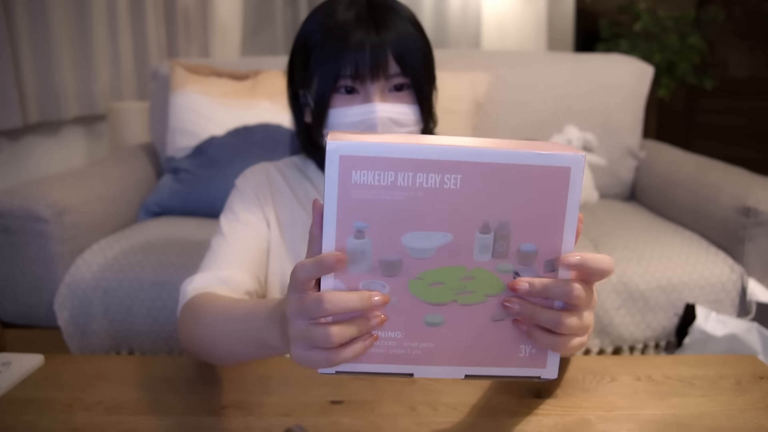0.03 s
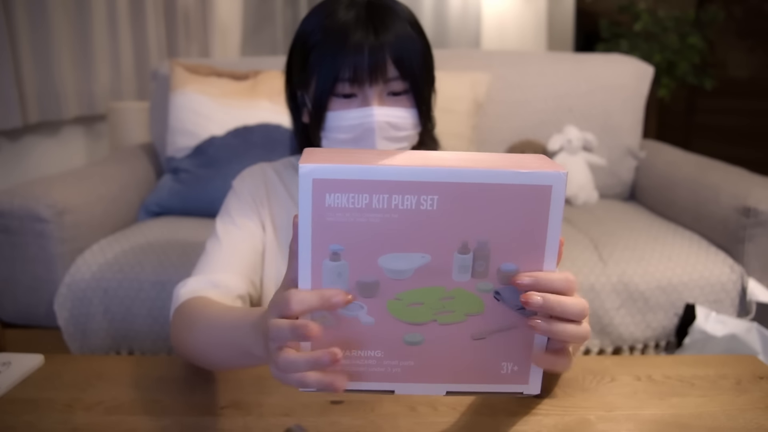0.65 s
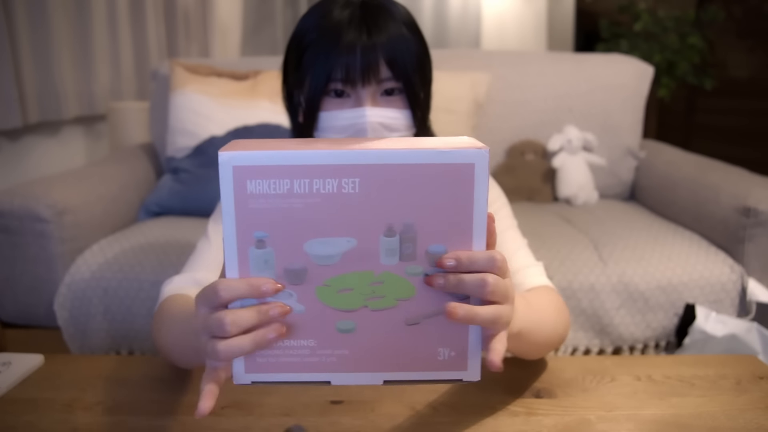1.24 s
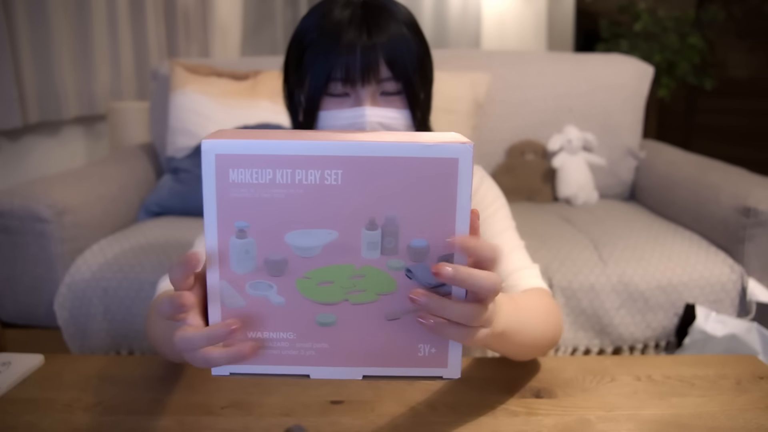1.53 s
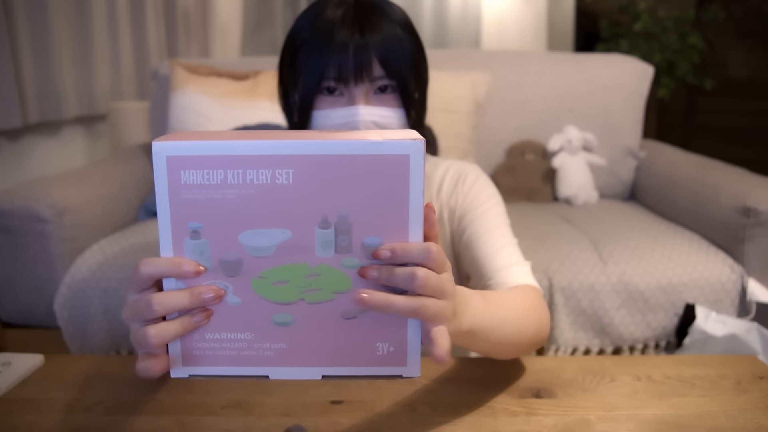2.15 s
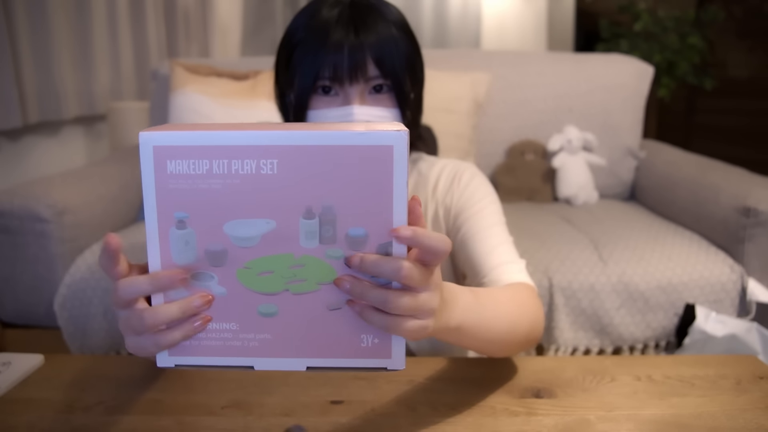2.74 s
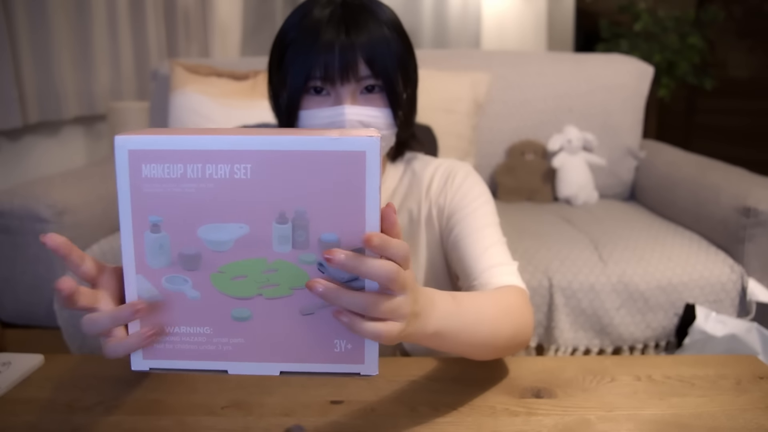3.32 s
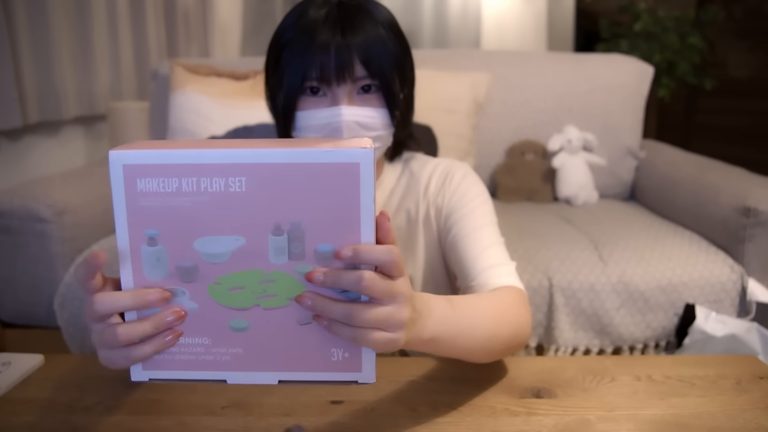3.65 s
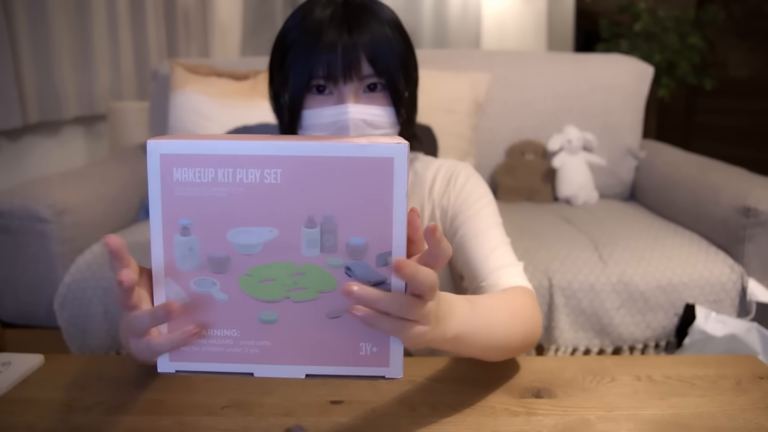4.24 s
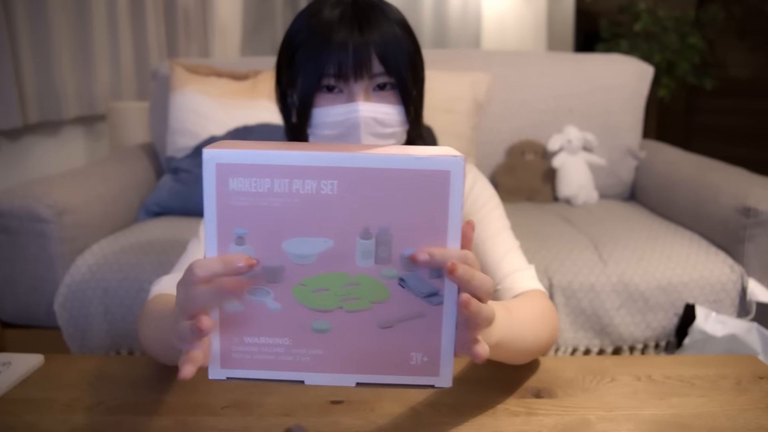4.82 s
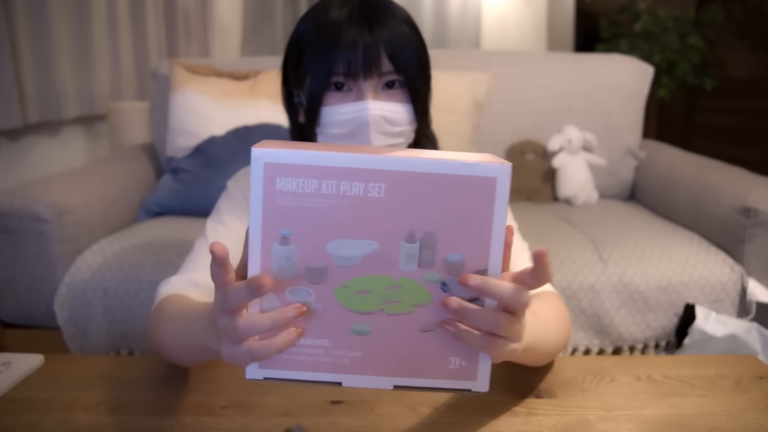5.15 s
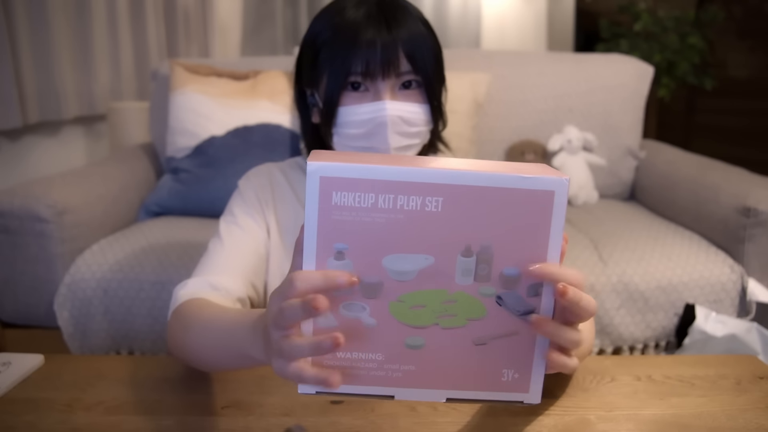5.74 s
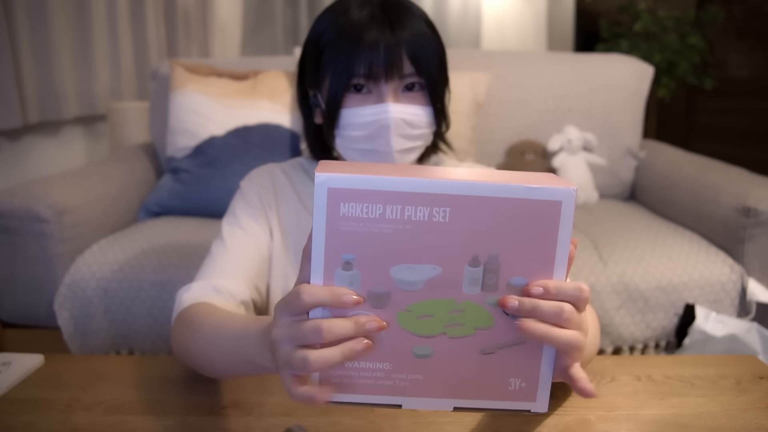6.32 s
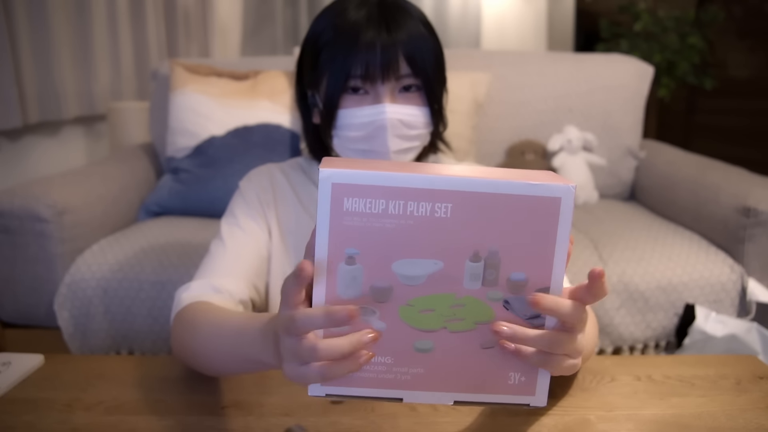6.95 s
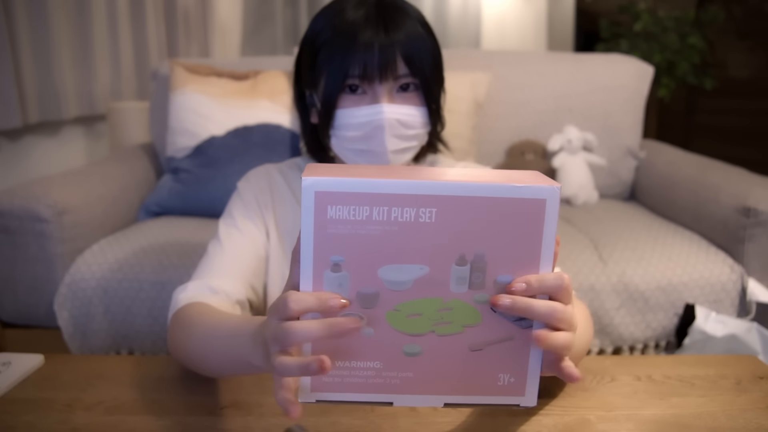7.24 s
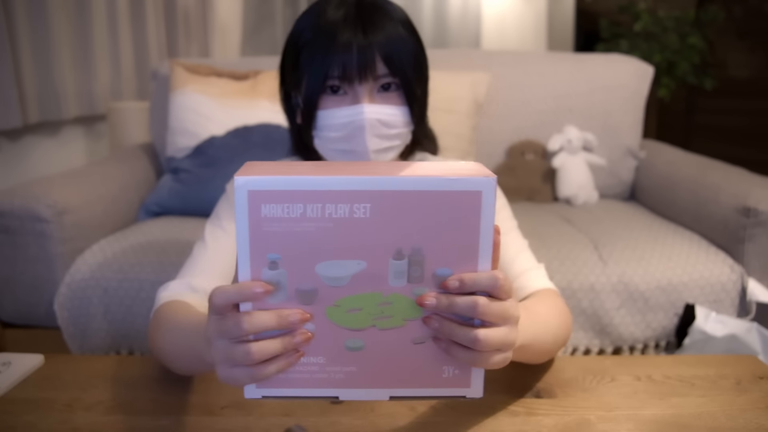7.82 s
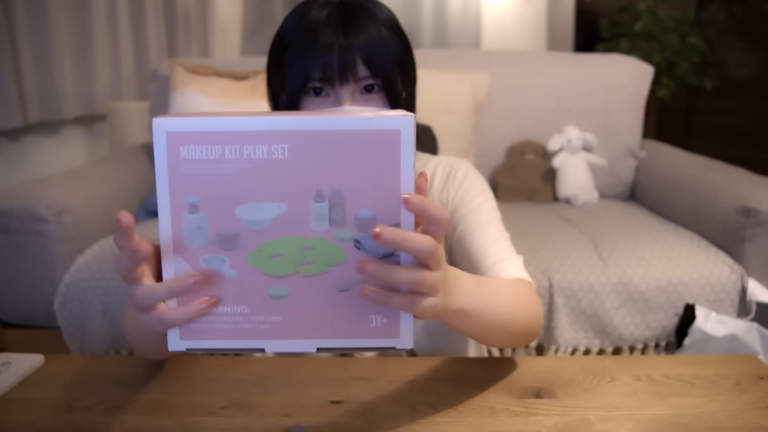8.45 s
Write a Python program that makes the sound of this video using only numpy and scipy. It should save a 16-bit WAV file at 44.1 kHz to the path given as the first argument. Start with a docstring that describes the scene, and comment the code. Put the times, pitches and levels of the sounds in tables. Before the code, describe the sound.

Long fingernails drum on a thin cardboard box close to a stereo microphone for almost nine seconds. From the start the rolls come about twice a second: one finger lands softly, then about three nails tap in quick succession, each giving a small hollow thump with a crisp click on top. Between taps the fingers press, catch and rub lightly on the card, and the box rings faintly. A hard knock stands out at about 3.2 seconds and another at about 8.3 seconds, each briefly ringing in the small, quiet room. The tapping begins near the centre, leans left from about 1.5 to 4.5 seconds, returns to the centre around 6 to 7 seconds and moves left again at the end. A deep, wavering rumble and faint room air continue underneath throughout.

```python
"""Long fingernails drum on a thin cardboard box close to a stereo microphone, about two rolls a second.
Per roll one finger lands softly, then about three nails tap: the panel thumps, fibres crack, the nail ticks.
Between taps the hand presses, catches and rubs on the card. The hollow box rings faintly.
Two hard knocks set the small, quiet room ringing; a deep rumble lies under everything."""
import sys
import numpy as np
from scipy import signal
from scipy.fft import rfft, irfft
from scipy.io import wavfile

SR = 44100
rng = np.random.default_rng(int(sys.argv[2]) if len(sys.argv) > 2 else 0)


def file_out(sig):
    """Save sig as 16-bit WAV at sys.argv[1]."""
    # one column per channel
    cols = np.atleast_2d(sig).T
    # limit, then scale
    lim = np.clip(cols, -1, 1)
    pcm = np.round(lim * 32767).astype(np.int16)
    wavfile.write(sys.argv[1], SR, pcm)


N = 382788
TIME_S = np.arange(N) / SR
HIT_SAMPLES = 2048
HIT_S = np.arange(HIT_SAMPLES) / SR
HIT_HZ = np.fft.rfftfreq(HIT_SAMPLES, 1 / SR)
ROLL_S = .46  # typical roll period


def amp(db):
    """Decibels to gain."""
    return 10 ** (np.asarray(db) / 20)


def curve_at(points, hz):
    """Interpolate on a log-frequency axis."""
    freq_hz, value = np.transpose(points)
    return np.interp(np.log(hz + 1), np.log(freq_hz), value)


def unit_rms(x):
    """Scale to rms 1."""
    return x / np.sqrt(np.mean(x ** 2) + 1e-20)


def at_level(x, db):
    """Scale a hit to the energy of db rms held for 10 ms."""
    return x * amp(db) * np.sqrt(.01 * SR / (np.mean(np.sum(x ** 2, -1)) + 1e-20))


def add(mix, start_s, sound):
    """Mix in a stereo sound."""
    part = mix[:, max(round(start_s * SR), 0):][:, :sound.shape[1]]
    part += sound[:, :part.shape[1]]


def minimum_phase(gain_db):
    """Response that rings only after the blow."""
    log_gain = np.log(amp(np.r_[gain_db, gain_db[-2:0:-1]]))
    return np.exp(np.conj(signal.hilbert(log_gain)))[:len(gain_db)]


def coloured(noise, spectrum):
    """Shape a full-length noise, rms 1."""
    gain = amp(curve_at(spectrum, np.fft.rfftfreq(N, 1 / SR)))
    return unit_rms(irfft(rfft(noise) * gain, N))


def panned(x, pan_db, lead_s_per_db=1.7e-5):
    """The nearer microphone hears a hit louder and earlier."""
    sides_db = np.array([[pan_db], [-pan_db]])
    delay_samples = np.round(np.maximum(-sides_db * lead_s_per_db, 0) * SR)
    delayed = irfft(rfft(x) * np.exp(-2j * np.pi * HIT_HZ * delay_samples / SR))
    return unit_rms(amp(sides_db / 2)) * delayed


# Still air: freq_hz, density_db
AIR_SPECTRUM = [(8, 0), (36, 0), (52, -15), (80, -24), (170, -23), (450, -34), (1000, -41), (3000, -53),
                (15000, -64.5)]


def rumble(hum_hz=32.2, width_hz=1.1, hum_db=-44.3, air_db=-49, waver=.7):
    """Deep, wavering hum in still room air."""
    hz = np.fft.rfftfreq(N, 1 / SR)
    noise = rng.standard_normal((6, N))
    band = 1 / (1 + ((hz - hum_hz) / width_hz) ** 4)
    hum = unit_rms(irfft(rfft(noise[0] + .55 * noise[1:3]) * band, N))
    hum = unit_rms(hum / (abs(signal.hilbert(hum)) + waver))  # flattens the swells
    air = coloured(.6 * noise[3] + noise[4:], AIR_SPECTRUM)
    return amp(hum_db) * hum * amp([[-2.5], [1]]) + amp(air_db) * air


# Room decay: freq_hz, t60_s
ROOM_DECAY = [(150, .28), (800, .25), (2000, .26), (5000, .26), (15000, .22)]
# Room tail: freq_hz, level_db
ROOM_SPECTRUM = [(100, -15), (300, -19), (800, -16.5), (1400, -15), (2000, -15), (3200, -13), (8000, -14),
                 (15000, -15)]


def room(x, early_s=.016, early_gain=1.1):
    """Dense random echoes: table and body first, then the walls, each band at its own decay rate."""
    echoes = rng.standard_normal((2, SR // 2)) * (rng.random((2, SR // 2)) < .06)
    echoes = unit_rms(echoes + .3 * echoes[::-1])
    hz, t, bands = signal.stft(echoes, SR, nperseg=256)
    t60_s = curve_at(ROOM_DECAY, hz)[:, None]
    level_db = curve_at(ROOM_SPECTRUM, hz)[:, None] - 60 * t / t60_s
    bands *= amp(level_db) * np.sqrt(2 * np.log(1000) / (t60_s * SR))
    tail = signal.istft(bands, SR, nperseg=256)[1]
    tail_s = np.arange(tail.shape[1]) / SR
    tail *= np.interp(tail_s, [.001, .009, early_s, early_s + .005], [0, early_gain, early_gain, 1])
    return signal.oaconvolve(.7 * x + .3 * x[::-1], tail, axes=1)[:, :N]


def shifting_echoes(x, cycle_s=.37, patterns=3):
    """Fingers strike new spots and the box sways, so the echo pattern keeps changing."""
    active = (TIME_S / cycle_s * patterns).astype(int) % patterns
    return sum(room(x * (active == k)) for k in range(patterns))


# Hollow box resonances: pitch_hz, relative_db, t60_s
BOX_MODES = [(165, -19, .25), (270, -15.5, .2), (862, -22, .15), (1053, -26, .12)]


def box_ring(x):
    """Air and walls of the box ring faintly after each blow."""
    t = np.arange(SR // 2) / SR
    ring = np.zeros_like(t)
    for pitch_hz, relative_db, t60_s in BOX_MODES:
        gain = amp(relative_db + 12) * np.log(1000) / (t60_s * SR)
        ring += gain * np.cos(2 * np.pi * pitch_hz * t) * amp(-60 * t / t60_s)
    return signal.oaconvolve(x, ring[None], axes=1)[:, :N]


# Box position: time_s, left_over_right_db
BOX_PATH = [(0, -4), (.8, 0), (1.6, 8), (3.9, 9), (6.4, -2), (7.3, 0), (8.3, 7)]


def box_pan_db(time_s):
    """The box is carried slowly from side to side."""
    return np.interp(time_s, *np.transpose(BOX_PATH))


# Panel thump: pitch_ratio, level_db
THUMP_SPECTRUM = [(.2, -20), (.45, -6.5), (.72, -1), (1.02, 0), (1.4, -5), (1.9, -14), (3, -30), (8, -60)]


def panel_gain(pitch_hz):
    """Spectrum of the panel pushed in and swinging back, dead within two cycles."""
    ratio, level_db = np.transpose(THUMP_SPECTRUM)
    return amp(np.interp(np.log(HIT_HZ + 1), np.log(pitch_hz * ratio), level_db))


def dent(gain, bend_hz=110):
    """An outside blow first drops the pressure; slow bending waves arrive late and swell the rebound."""
    allpass = (1j * HIT_HZ - bend_hz) / (1j * HIT_HZ + bend_hz)
    return -irfft(minimum_phase(20 * np.log10(gain + 1e-7)) * allpass)


def ripple_db(depth_db, points=20):
    """Each spot on the card has its own broad peaks and dips."""
    return depth_db * np.interp(HIT_HZ, np.geomspace(400, 16000, points), rng.standard_normal(points))


def crunch(spectrum, decay_s, snap, width, spot_db, slip_gain=.26, slip_within_s=.006):
    """Nail meets card: a snap, crushing fibres and a small second slip, different at each microphone."""
    since_slip_s = HIT_S - slip_within_s * rng.uniform(.15, 1)
    slip = slip_gain * rng.uniform(0, 1.5) * (since_slip_s > 0) * np.exp(-abs(since_slip_s) / decay_s)
    grit = rng.standard_normal((3, HIT_SAMPLES)) * (np.exp(-HIT_S / decay_s) + slip)
    grit = grit[0] + width * grit[1:]
    grit /= np.sqrt(np.sum(grit ** 2) / 2)
    grit[:, 0] -= snap
    return irfft(rfft(grit) * minimum_phase(curve_at(spectrum, HIT_HZ) + ripple_db(spot_db)))


def puff(time_s, level_db, width_s=.0058, rebound_s=.021, rebound_gain=.42):
    """A finger pad shoves the box and it sways back: one slow air pulse. Returns start_s, sound."""
    t = np.arange(3 * HIT_SAMPLES) / SR - .03
    wave = rebound_gain * np.exp(-((t - rebound_s) / .012) ** 2) - np.exp(-(t / width_s) ** 2)
    pan_db = 1.8 * box_pan_db(time_s)
    sides = unit_rms(amp(np.array([[pan_db], [-pan_db]]) / 2))
    return time_s - .021, amp(level_db) * wave * sides


# Firm pad presses: time_s, level_db
PAD_PRESSES = [(1.381, -30), (1.803, -21), (2.241, -25), (2.569, -29), (2.693, -24), (3.172, -28),
               (3.634, -23), (5.962, -30), (7.294, -30)]


def pressing():
    """The box gives under each landing, tap and firm press."""
    out = np.zeros((2, N))
    for start_s, nail_db in SOFT_LANDINGS:
        add(out, *puff(start_s, min(fingertip_db(start_s, nail_db) + 10.5, -26)))
    for start_s, blow_db, *_ in NAIL_TAPS:
        add(out, *puff(start_s - .004, min(blow_db - 4, -35.5)))
    for time_s, level_db in PAD_PRESSES:
        add(out, *puff(time_s, level_db))
    return out


def roll_starts_s():
    """Landing times, padded by one roll at each end."""
    starts_s = np.transpose(SOFT_LANDINGS)[0]
    return np.r_[starts_s[0] - ROLL_S, starts_s, starts_s[-1] + ROLL_S]


def skin_grip(lift_s=.08, lifted_db=-22):
    """Drag through each roll: most as the fingers peel off, least while they hover."""
    starts_s = roll_starts_s()
    roll = np.clip(np.searchsorted(starts_s, TIME_S), 1, len(starts_s) - 1)
    length_s = np.minimum(starts_s[roll] - starts_s[roll - 1], ROLL_S + .02)
    elapsed_s = TIME_S - starts_s[roll - 1]
    lifted = np.clip((elapsed_s - length_s + lift_s) / .02, 0, 1)
    drag_db = np.interp(elapsed_s / length_s, [0, .05, .1, .45, .6, .75, 1], [-4, -3, -13, -6, -6, 1.5, 0])
    return amp(drag_db + lifted_db * lifted)


def rubbing(rub_db=-63, slips_per_s=280, spread_db=5.2, hiss=.3, catches_per_s=10, catch_db=-59):
    """Skin and nails drag on card: sparse uneven slips, fine hiss, occasional faint catches."""
    grip = skin_grip()
    slips = (rng.random(N) < slips_per_s / SR) * amp(spread_db * np.minimum(rng.exponential(1, N), 4))
    grit = signal.oaconvolve(slips, np.exp(-HIT_S / .0007))[:N]
    drag = (unit_rms(grit) + hiss) * rng.standard_normal((2, N))
    # freq_hz, level_db
    spectrum = [(80, 4), (150, 18), (250, 5), (450, 10), (1000, 9), (1700, 9), (3200, -2), (5500, -1),
                (9000, -2), (16000, -9)]
    out = coloured(drag, spectrum) * amp(rub_db) * grip
    for position, chance, size in rng.random((300, 3)):
        start_s = position * N / SR
        if chance * 300 < catches_per_s * N / SR:
            add(out, start_s, nail_catch(start_s, catch_db + 9 * (size - .5)) * grip[int(position * N)])
    return out


# Glancing nail: freq_hz, level_db
GLANCE_SPECTRUM = [(400, -1), (1000, -5), (1600, 1), (2800, -12), (4000, -8), (5200, 1), (6800, -6),
                   (9000, -5.5), (15000, -15)]


def nail_catch(start_s, level_db):
    """A nail catches for an instant and skids on."""
    nail = at_level(crunch(GLANCE_SPECTRUM, decay_s=.0013, snap=.4, width=.8, spot_db=3.6), level_db - 2.2)
    tick = at_level(crunch(TICK_SPECTRUM, decay_s=.0009, snap=.4, width=.8, spot_db=3), level_db - 4.5)
    tip = at_level(dent(panel_gain(410 * 2 ** rng.uniform(-.7, .7))), level_db + 1)
    return panned(nail + tick + tip, .6 * box_pan_db(start_s))


def roll_catches(from_s, to_s, level_db, per_roll, spread_db=2):
    """Light nail catches in the same window after every landing."""
    out = np.zeros((2, N))
    for landing_s in np.repeat(roll_starts_s()[1:-1], per_roll):
        start_s = landing_s + from_s + (to_s - from_s) * rng.random()
        add(out, start_s, nail_catch(start_s, level_db + spread_db * rng.standard_normal()))
    return out


# Single nail catches: start_s, level_db
STRAY_CATCHES = [(0.1633, -52), (0.4799, -47), (0.6013, -47), (0.8296, -47), (1.933, -47), (1.9639, -51),
                 (2.0658, -47), (2.1728, -48), (2.3701, -50), (2.6831, -44), (2.838, -50), (3.3034, -51),
                 (3.3454, -51), (3.6479, -46), (3.7929, -47), (4.0376, -47), (4.6842, -52), (5.0466, -47),
                 (5.5113, -47), (5.646, -51), (5.9173, -46), (6.0124, -47), (6.1202, -51), (6.3887, -46),
                 (6.8467, -45), (6.8727, -45), (7.1439, -53), (7.8301, -47), (8.491, -52)]


def stray_catches():
    """Nails catch on the card as the fingers lift and shift."""
    out = np.zeros((2, N))
    for start_s, level_db in STRAY_CATCHES:
        add(out, start_s, nail_catch(start_s, level_db))
    return out


def fingertip_db(start_s, nail_db):
    """Flesh impact of a landing; grows as the box nears the left microphone."""
    return nail_db + 1.5 + .4 * box_pan_db(start_s)


# First finger of each roll: start_s, nail_db
SOFT_LANDINGS = [(0.234, -50), (0.6902, -46), (1.165, -43), (1.6078, -43), (2.0417, -34), (2.5133, -44),
                 (2.9618, -40), (3.4455, -51), (3.9072, -48), (4.3716, -44), (4.8259, -51), (5.3108, -42),
                 (5.7721, -44), (6.2483, -53), (6.7112, -52), (7.2241, -47), (7.6791, -46), (8.1418, -44)]


def landings(shift_db=2.5, skid_s=.017, skid_db=-11):
    """Nail and fingertip land at a glance and skid on; the panel hardly rings."""
    out = np.zeros((2, N))
    for start_s, nail_db in SOFT_LANDINGS:
        pan_db = box_pan_db(start_s) + shift_db
        nail = at_level(crunch(GLANCE_SPECTRUM, decay_s=.0016, snap=.3, width=.7, spot_db=2.2), nail_db)
        tip = at_level(dent(panel_gain(180)), fingertip_db(start_s, nail_db) + .3)
        add(out, start_s, panned(nail, .6 * pan_db) + panned(tip, pan_db))
        add(out, start_s + skid_s * rng.uniform(.5, 1.5), nail_catch(start_s, min(nail_db, -43) + skid_db))
    return out


# Fingers of a roll: after_landing_s, pitch_hz, knock_over_thump_db, pan_shift_db
ROLL_FINGERS = [(.065, 298, -9.3, .5), (.125, 290, -7.5, 0), (.17, 255, -6.8, -2), (.21, 238, -5.8, -4)]


def finger_at(start_s):
    """Later fingers land further along the card: lower pitch, more knock, further right."""
    starts_s = roll_starts_s()
    elapsed_s = start_s - starts_s[starts_s <= start_s][-1]
    after_landing_s, *columns = np.transpose(ROLL_FINGERS)
    return [np.interp(elapsed_s, after_landing_s, column) for column in columns]


# Box knock: freq_hz, level_db
KNOCK_SPECTRUM = [(300, -16), (480, -3.5), (640, -1.5), (880, 0), (1080, -2.5), (1400, -10), (2500, -29),
                  (6000, -60)]
# Fibre crack: freq_hz, level_db
CRACK_SPECTRUM = [(700, -25), (1250, -7.5), (1700, 0), (2300, -2.5), (3200, -4), (4000, -6), (6000, -25)]
# Nail tick: freq_hz, level_db
TICK_SPECTRUM = [(2500, -22), (4500, -4), (6000, -2), (8000, 0), (10000, -2), (13000, -4.8), (16000, -10)]


def nail_tap(pitch_hz, body_db, knock_over_db, crack_db, tick_db, pan_db, lag_cycles=.1):
    """One blow: panel thump and knock, with fibre crack and nail tick on top."""
    knock = unit_rms(amp(curve_at(KNOCK_SPECTRUM, HIT_HZ) + ripple_db(2.6, points=26)))
    thump_db = body_db - 10 * np.log10(1 + amp(knock_over_db) ** 2)
    gain = amp(thump_db) * np.hypot(unit_rms(panel_gain(pitch_hz)), amp(knock_over_db - .3) * knock)
    gain *= 1 + .24 * np.cos(2 * np.pi * HIT_HZ * rng.uniform(.0026, .0048))  # panel edge reflection
    body = at_level(dent(gain), body_db)
    body = np.roll(body, round(lag_cycles / pitch_hz * SR))  # nail bites before the panel gives
    crack = at_level(crunch(CRACK_SPECTRUM, decay_s=.00055, snap=.8, width=1.1, spot_db=3.4), crack_db)
    tick = at_level(crunch(TICK_SPECTRUM, decay_s=.00058, snap=.8, width=.6, spot_db=1.9), tick_db)
    return panned(body, pan_db) + panned(crack, .75 * pan_db) + panned(tick, .55 * pan_db - 1.5)


# Nail blows on the card: start_s, blow_db, crack_db, tick_db
NAIL_TAPS = [(0.0066, -32, -30, -37), (0.0243, -40, -40, -37), (0.3282, -33, -54, -46),
             (0.4172, -34, -50, -48), (0.4521, -32, -42, -42), (0.4931, -31, -37, -40),
             (0.504, -37, -44, -45), (0.7594, -28, -45, -43), (0.8408, -28, -42, -43),
             (0.8755, -32, -41, -36), (0.8987, -32, -36, -39), (1.2317, -27, -45, -40),
             (1.322, -39, -55, -47), (1.3593, -40, -48, -48), (1.3759, -35, -38, -42),
             (1.3876, -35, -39, -36), (1.676, -25, -41, -37), (1.7343, -30, -44, -44),
             (1.7822, -36, -50, -47), (1.8097, -30, -40, -40), (2.1028, -27, -46, -42),
             (2.2408, -34, -44, -43), (2.2478, -32, -44, -43), (2.2806, -39, -48, -48),
             (2.5775, -24, -42, -40), (2.6432, -28, -43, -37), (2.695, -29, -41, -40),
             (2.724, -35, -37, -42), (3.0186, -27, -44, -41), (3.0923, -30, -48, -48),
             (3.1447, -33, -44, -45), (3.1541, -16, -27, -22), (3.1807, -22, -29, -31),
             (3.5134, -26, -41, -38), (3.5738, -27, -44, -34), (3.6281, -33, -49, -46),
             (3.6404, -29, -44, -39), (3.9816, -28, -45, -45), (4.046, -27, -42, -39),
             (4.0794, -28, -48, -44), (4.1095, -36, -47, -45), (4.4485, -28, -45, -45),
             (4.49, -35, -47, -46), (4.5193, -27, -42, -35), (4.5336, -34, -46, -39),
             (4.5778, -39, -48, -45), (4.9033, -26, -46, -42), (4.9708, -28, -43, -36),
             (4.9902, -29, -43, -41), (5.0145, -32, -42, -42), (5.3874, -27, -48, -43),
             (5.4493, -27, -41, -35), (5.4845, -39, -51, -47), (5.839, -25, -45, -41),
             (5.8984, -26, -42, -35), (5.9537, -31, -43, -43), (6.2751, -38, -53, -46),
             (6.3114, -27, -48, -42), (6.3696, -36, -51, -54), (6.4153, -40, -50, -44),
             (6.4242, -33, -37, -40), (6.776, -35, -54, -48), (6.8289, -25, -41, -37),
             (6.8978, -37, -50, -45), (7.2926, -22, -39, -35), (7.341, -34, -55, -46),
             (7.3593, -31, -48, -48), (7.4202, -36, -44, -41), (7.744, -24, -45, -39),
             (7.7991, -33, -49, -44), (7.8566, -36, -46, -46), (7.872, -37, -45, -45),
             (8.1995, -26, -47, -40), (8.2238, -25, -47, -42), (8.2658, -31, -48, -43),
             (8.341, -17, -26, -24), (8.6671, -35, -53, -45)]


def drumming(hard_from_db=-35, hard_span_db=8, hard_knock_db=8, hard_room_db=2, scatter_oct=.06):
    """All taps, direct and room send. Hard blows ring higher, knock the whole box and carry further."""
    direct, room_send = np.zeros((2, 2, N))
    for (start_s, blow_db, crack_db, tick_db), spot in zip(NAIL_TAPS, rng.standard_normal(len(NAIL_TAPS))):
        pitch_hz, knock_over_db, shift_db = finger_at(start_s)
        hardness = np.clip((crack_db - hard_from_db) / hard_span_db, 0, 1)
        pitch_hz *= (1 + 1.05 * hardness) * 2 ** (scatter_oct * spot)
        knock_over_db += hard_knock_db * hardness
        pan_db = box_pan_db(start_s) + shift_db * (1 - .5 * hardness)
        tap = nail_tap(pitch_hz, blow_db - .1, knock_over_db, crack_db - 1.7, tick_db + .3, pan_db)
        add(direct, start_s, tap)
        add(room_send, start_s, tap * amp(hard_room_db * hardness))
    return direct, room_send


def scene():
    """Hand on the box, box ring, room, rumble."""
    taps, room_send = drumming()
    light = landings() + stray_catches()
    light += roll_catches(from_s=.14, to_s=.25, level_db=-55, per_roll=2)  # resting nails shift
    light += roll_catches(from_s=.31, to_s=.39, level_db=-57, per_roll=3)  # nails stutter off the card
    light += rubbing()
    direct = taps + light
    return direct + box_ring(direct) + shifting_echoes(room_send + 1.1 * light) + pressing() + rumble()


def record(dry, cutoff_hz=16300):
    """Clip at full scale, then low-pass."""
    lowpass = signal.firwin(255, cutoff_hz, window=("kaiser", 9), fs=SR)
    return signal.oaconvolve(np.clip(dry, -1, 1), lowpass[None], "same")


dry = scene()
out = record(dry)
file_out(out)
```